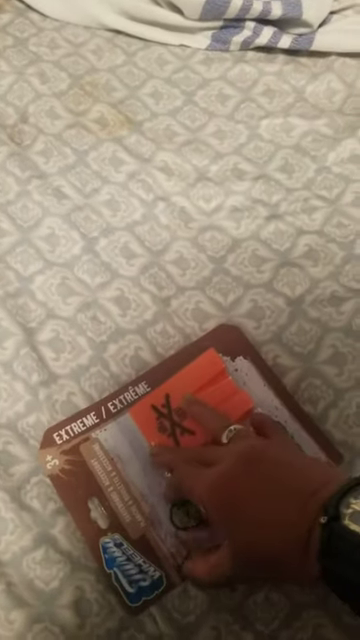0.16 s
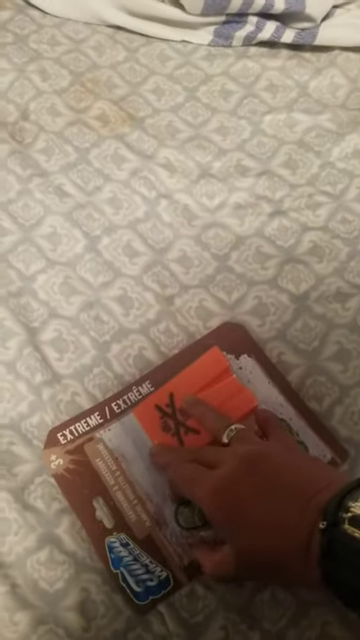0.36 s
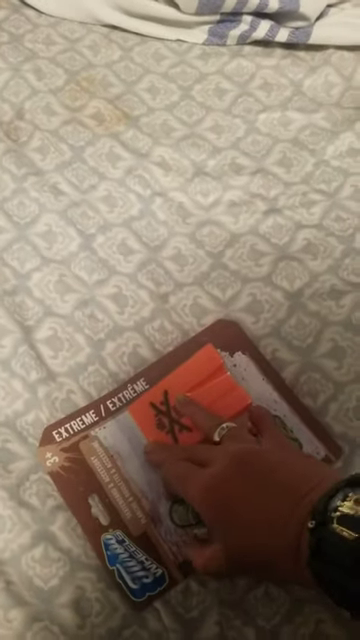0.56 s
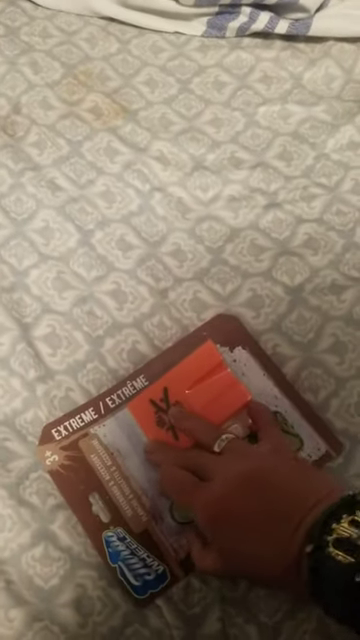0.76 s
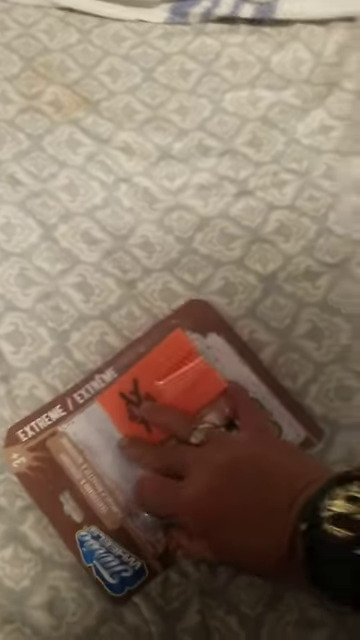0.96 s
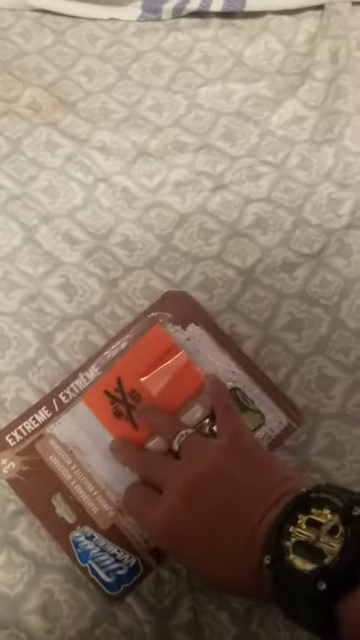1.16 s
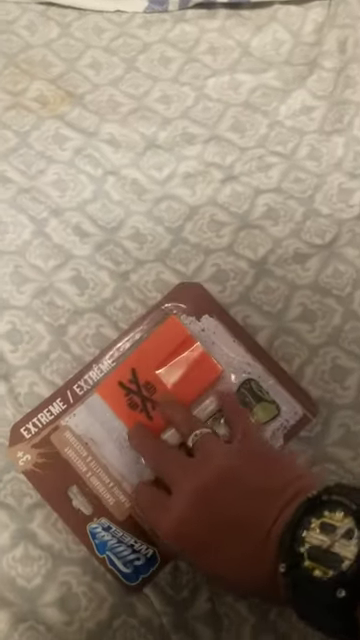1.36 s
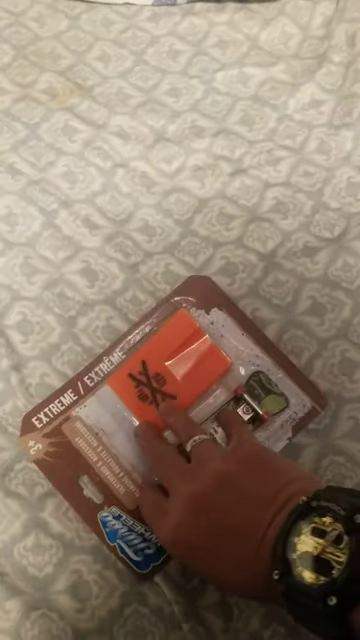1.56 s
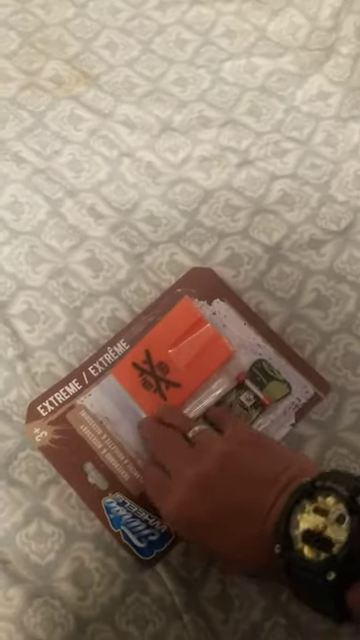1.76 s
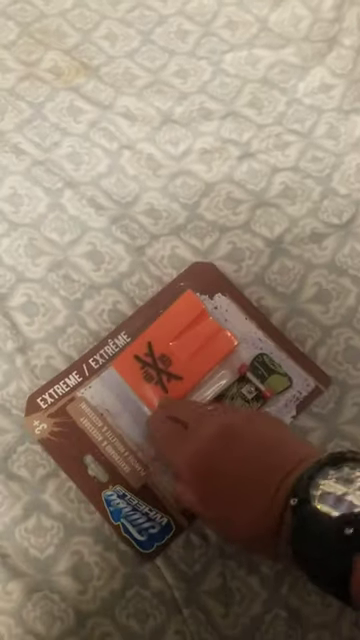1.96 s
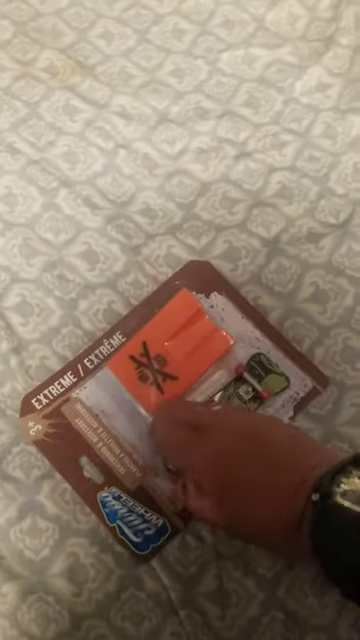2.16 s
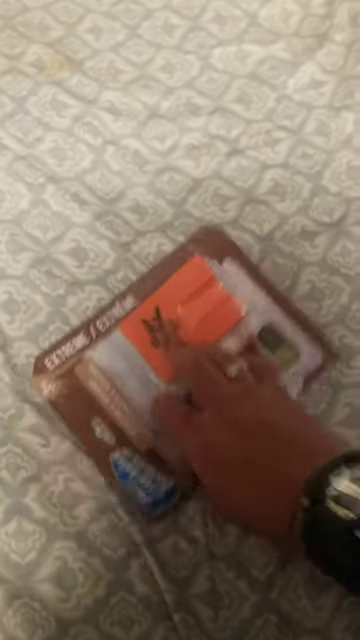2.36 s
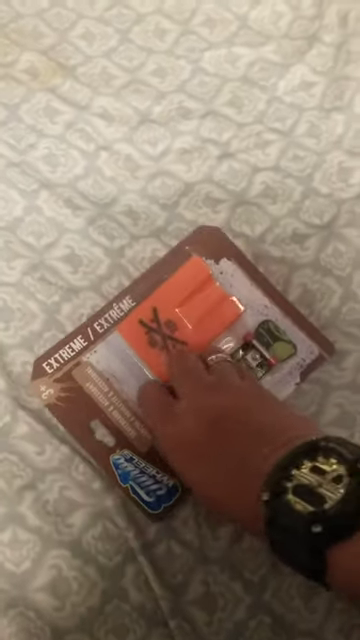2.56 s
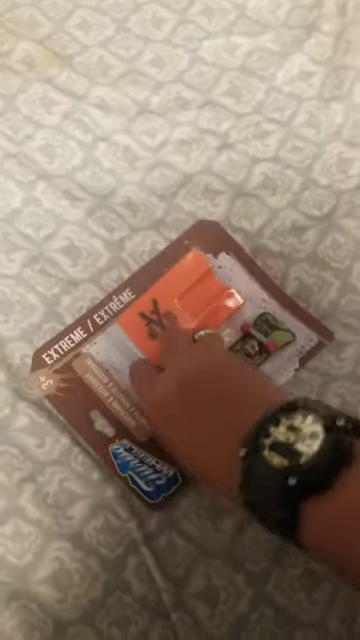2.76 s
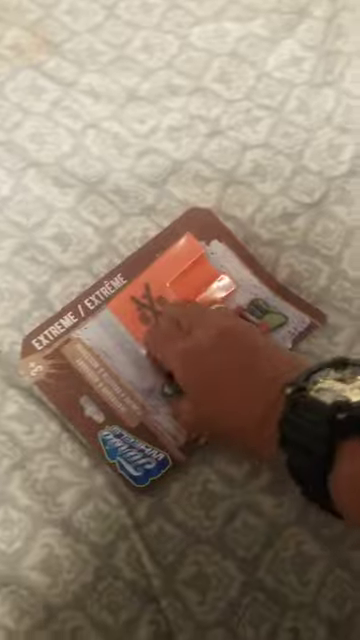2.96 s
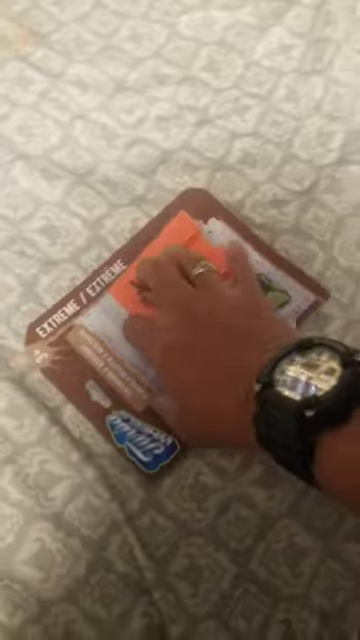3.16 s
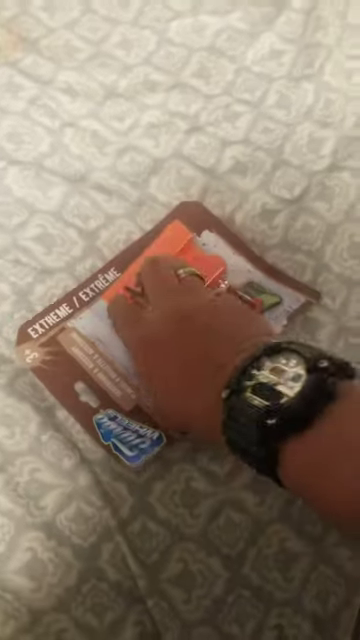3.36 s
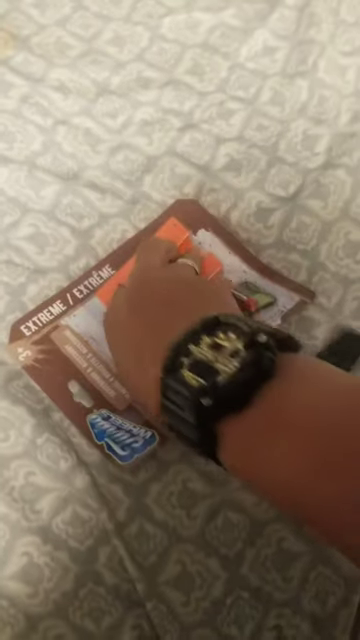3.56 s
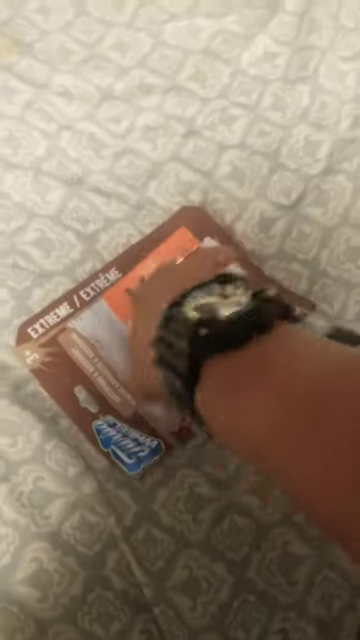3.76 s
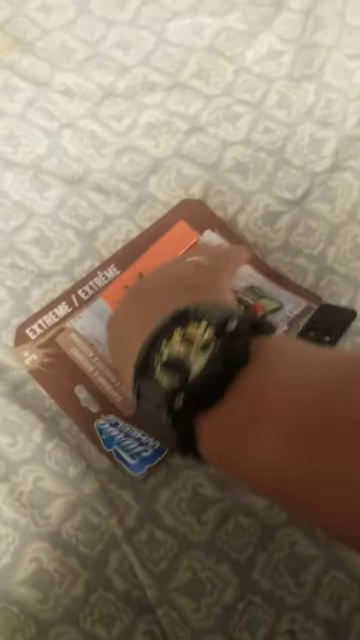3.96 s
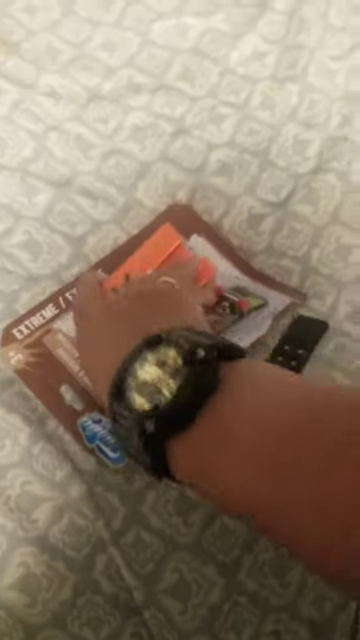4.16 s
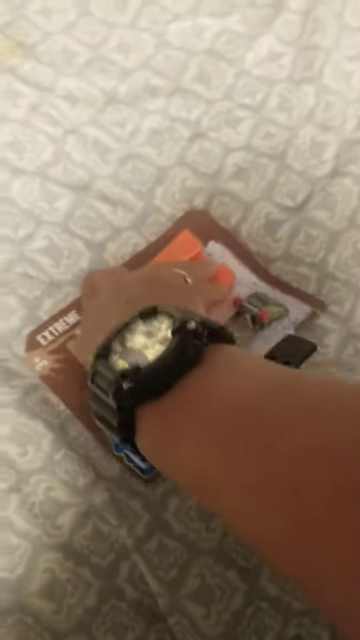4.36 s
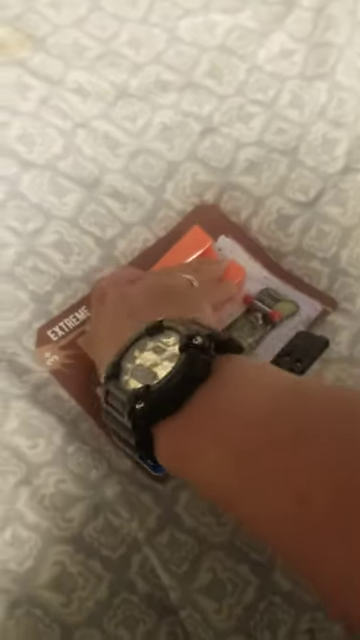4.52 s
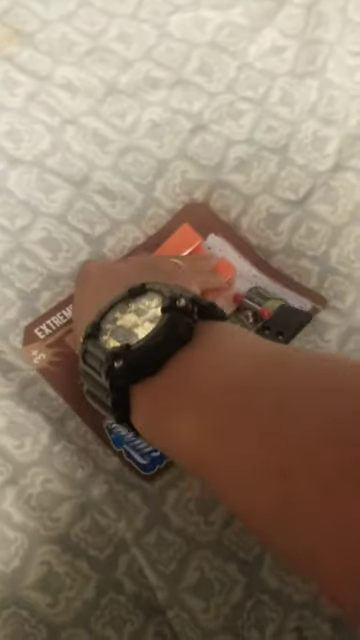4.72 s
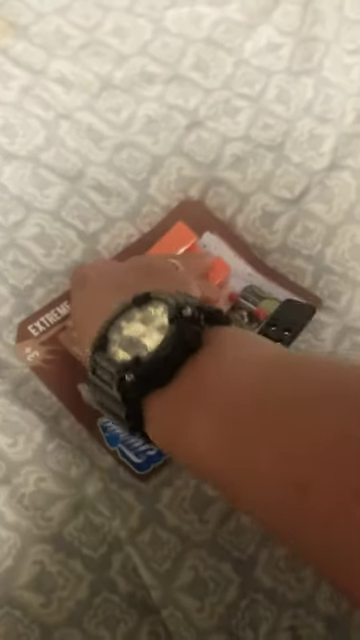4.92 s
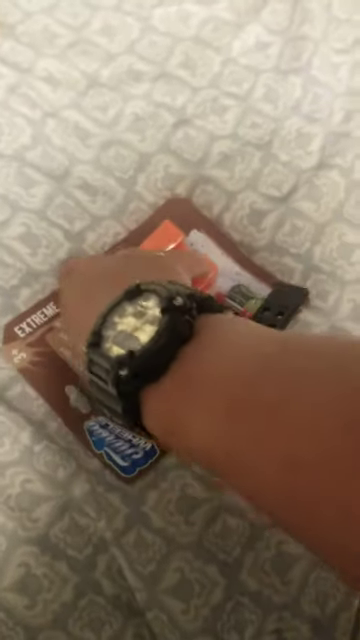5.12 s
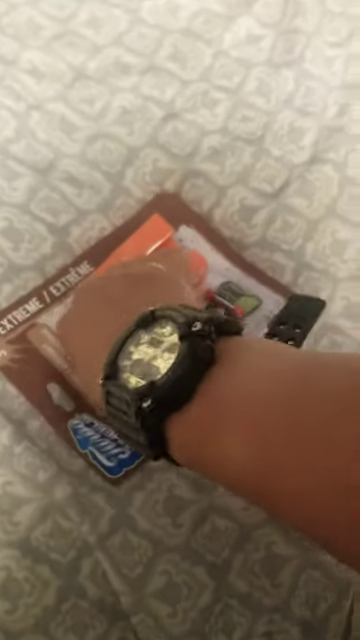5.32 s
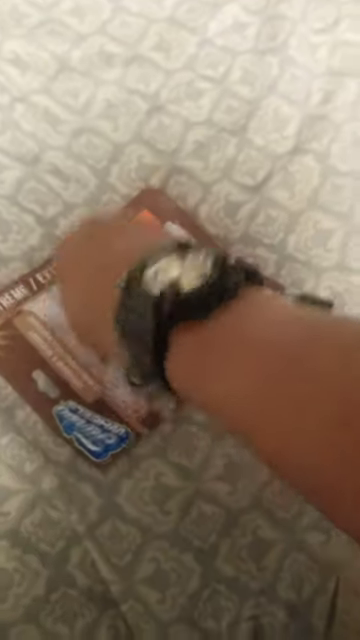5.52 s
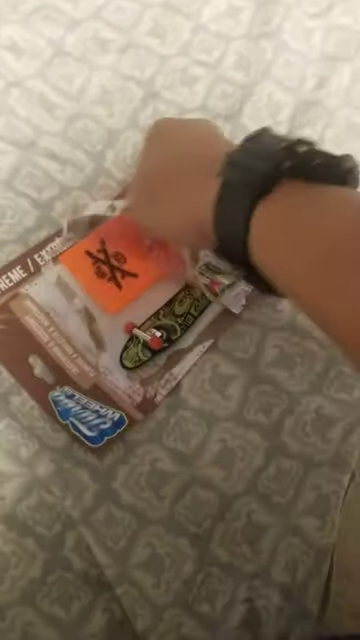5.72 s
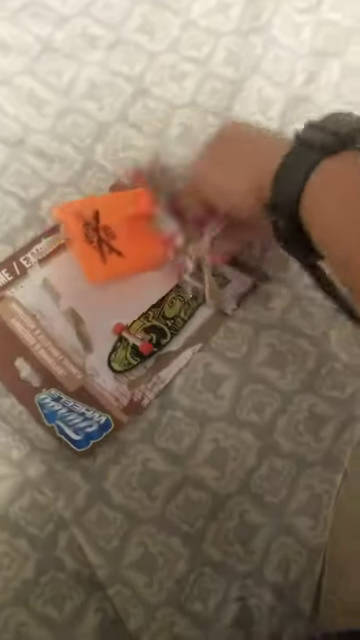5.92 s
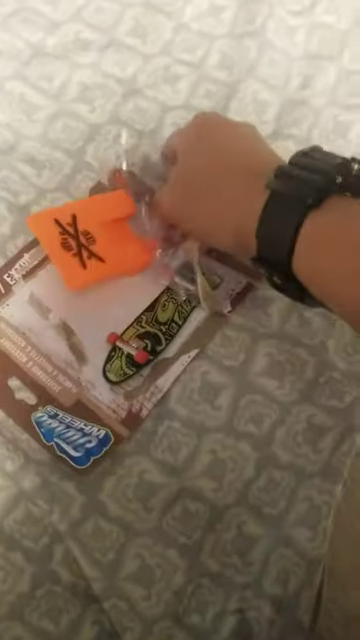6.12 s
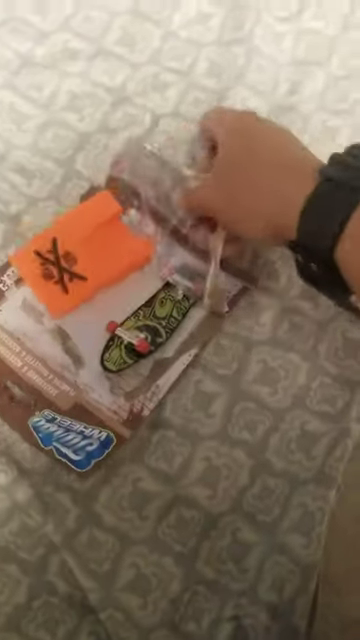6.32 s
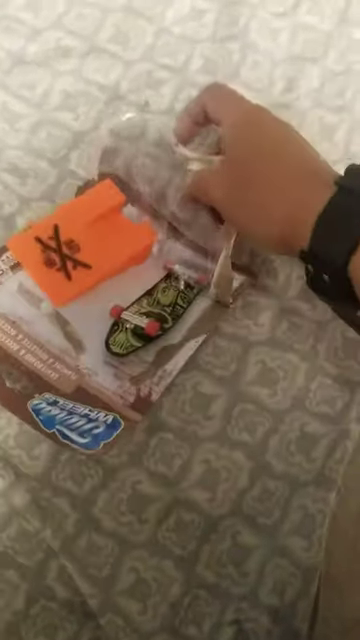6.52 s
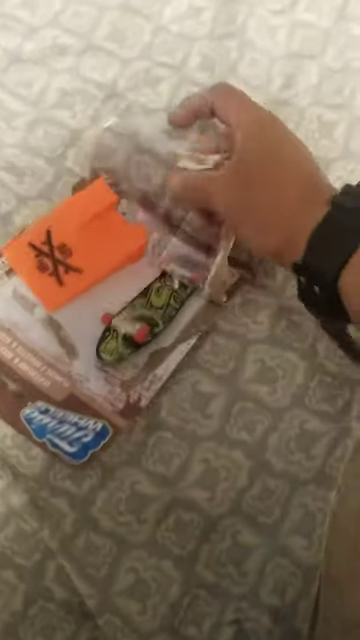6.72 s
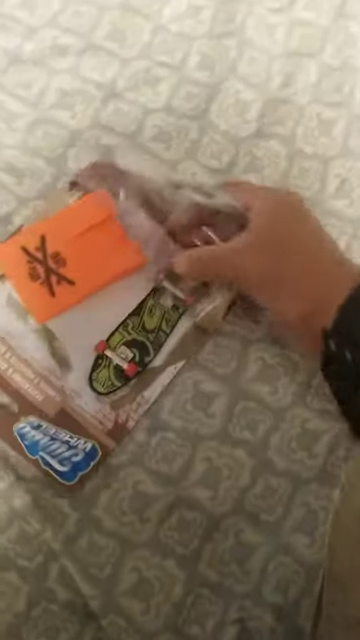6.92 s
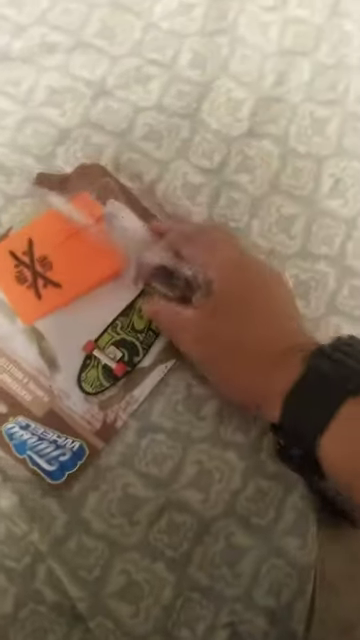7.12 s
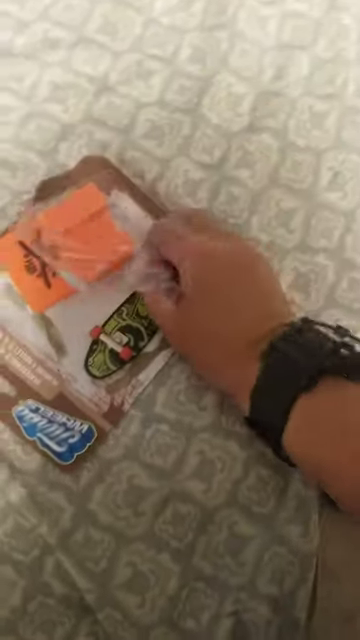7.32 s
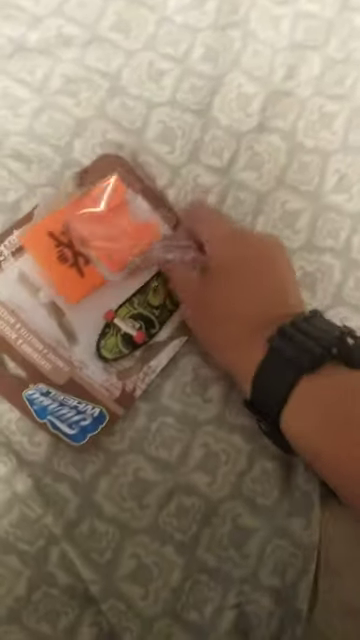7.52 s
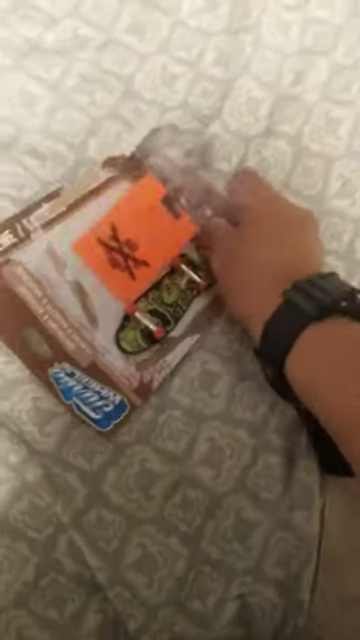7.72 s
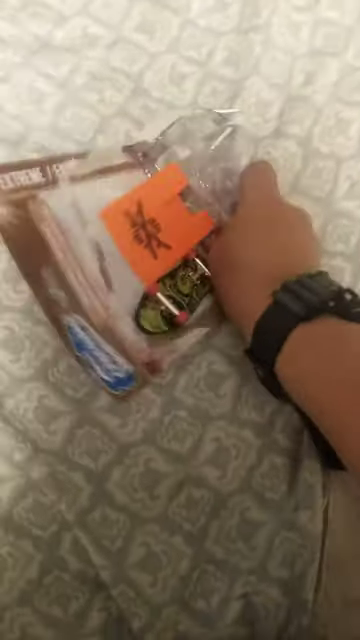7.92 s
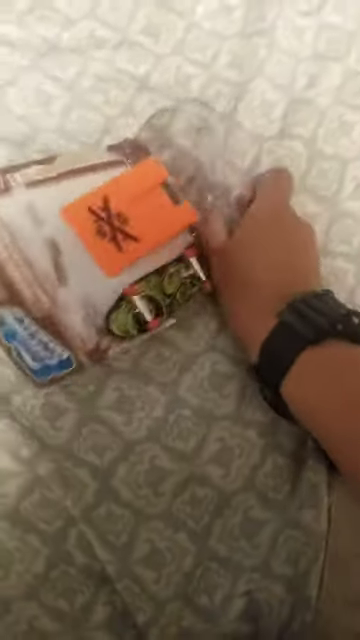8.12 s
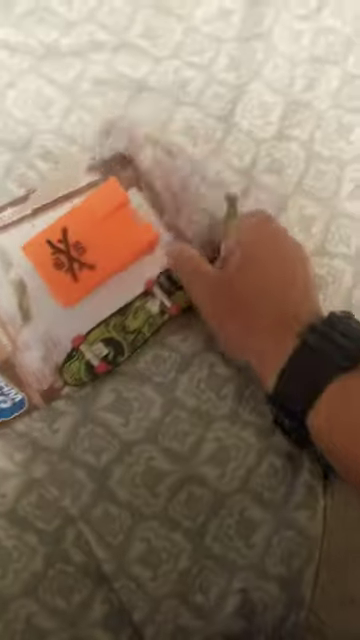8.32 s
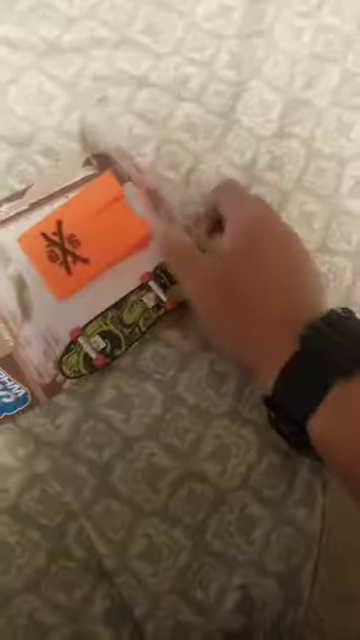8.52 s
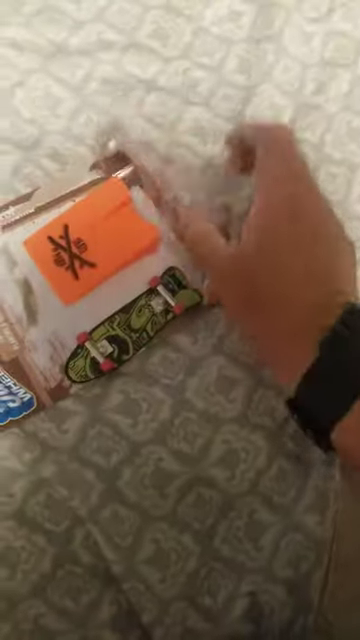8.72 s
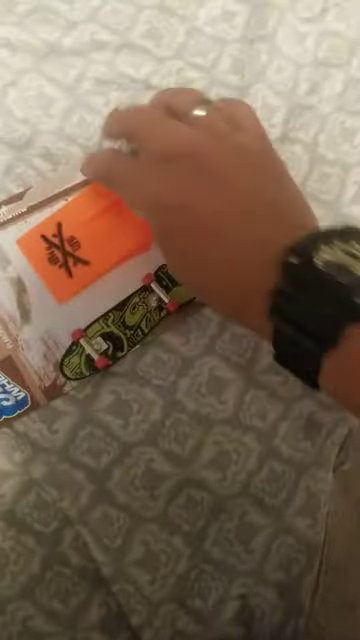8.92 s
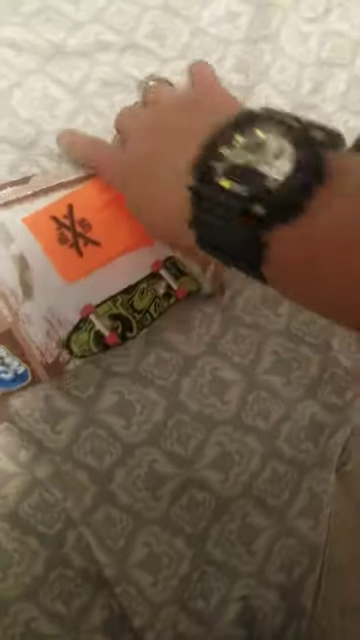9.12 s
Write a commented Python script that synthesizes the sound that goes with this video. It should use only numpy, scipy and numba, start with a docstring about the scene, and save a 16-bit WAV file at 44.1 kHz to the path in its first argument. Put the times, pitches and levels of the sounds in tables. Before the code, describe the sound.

A sharp plastic snap opens, followed by scattered clicks and brief creaks as a hand presses a blister pack. The snapping grows more frequent, then turns into dense crackling with scratchy cardboard tearing as the plastic comes off its card. Crinkling continues, pauses briefly and returns. The pack softly thumps the mattress underneath. It is heard close up on a hand-held phone in a small, soft room.

```python
"""A sharp plastic snap, then crackling: one hand crushes a blister pack and tears it off its card.
Each small face of the plastic (a facet) buckles and rings for a few milliseconds. Tiny crackles,
a creaking seal, sliding fingers and tearing paper fill the gaps, and the card thumps the mattress
under it. A small, soft room answers with one echo and a short tail, heard by a hand-held phone."""
import sys
import numpy as np
from scipy import signal
from scipy.fft import rfft, irfft
from scipy.io import wavfile
from scipy.ndimage import uniform_filter1d
from numba import njit

SR = 44100
rng = np.random.default_rng(int(sys.argv[2]) if len(sys.argv) > 2 else 0)


def wrap_up_sound(samples):
    """Save the sound to the file named by the first command line argument, as 16-bit audio."""
    columns = np.atleast_2d(samples).T
    # keep every value between -1 and 1, then stretch to whole-number steps
    tamed = np.clip(columns, -1, 1)
    steps = np.round(tamed * 32767).astype(np.int16)
    wavfile.write(sys.argv[1], SR, steps)


N = 404838  # samples, about 9.2 seconds


def undb(db):
    """Turn decibels into a number to multiply by."""
    return 10 ** (np.asarray(db) / 20)


def value_at(table, hz):
    """Read between the rows of a (Hz, value) table, on a scale of octaves."""
    row_hz, values = np.transpose(table)
    return np.interp(np.log(np.maximum(hz, 1)), np.log(row_hz), values)


def noise(spectrum, alike_hz):
    """Stereo noise of strength 1 (rms); left and right are alike below alike_hz."""
    hz = np.fft.rfftfreq(N, 1 / SR)
    mid, side = rfft(rng.standard_normal((2, N))) * undb(value_at(spectrum, hz))
    side = side * hz / np.hypot(hz, alike_hz)
    x = irfft(np.array([mid + side, mid - side]), N)
    return x / np.sqrt(np.mean(x ** 2))


def wander(per_s):
    """Glide to a new random value per_s times a second, mostly between -1 and 1."""
    step = int(SR / per_s)
    return uniform_filter1d(np.repeat(rng.standard_normal(N // step + 1), step), step)[:N]


@njit
def add_rings(out, start, hz, fade_s, rise_s, gain):
    """Add tones that rise quickly and die away. A fade time is the time to fall 60 dB."""
    for k in range(len(start)):
        tone_step = np.exp(2j * np.pi * hz[k] / SR - np.log(1000) / (fade_s[k] * SR))
        rise_step = np.exp(-1 / (rise_s[k] * SR))
        tone, held_back = 1 + 0j, 1.
        for i in range(start[k], min(start[k] + int(fade_s[k] * SR), out.shape[1])):
            tone, held_back = tone * tone_step, held_back * rise_step
            out[0, i] += (gain[0, k] * tone).imag * (1 - held_back) ** 2
            out[1, i] += (gain[1, k] * tone).imag * (1 - held_back) ** 2


def stereo(hz, left_db, level_luck, phase_luck, lag_s=.00009, bass_left_db=8.0):
    """Level and phase at the two microphones: bass leans left, treble differs at random."""
    apart = hz / np.hypot(hz, 3500)
    db = bass_left_db / (1 + (hz / 900) ** 4) + (left_db + 3.5 * level_luck) * apart
    turn = 2 * np.pi * hz * lag_s + 2.0 * apart ** 2 * phase_luck
    return np.array([undb(db / 2) * np.exp(.5j * turn), undb(-db / 2) * np.exp(-.5j * turn)])


# The tone of the quiet room. Each row: frequency in Hz, relative level in dB.
AIR_SPECTRUM = [(18, -20.5), (30, -14), (93, -2), (1340, -24.5), (2050, -21), (5300, -14.5), (8530, -31.5),
                (13400, -17.5), (16500, -31)]
def quiet_air(level_db=-67.5):
    """A faint, steady hush behind everything."""
    return noise(AIR_SPECTRUM, alike_hz=800.) * undb(level_db + np.array([[1.5], [-1.5]]))


# The first echo. Each row: delay in seconds, left level in dB, right level in dB.
FIRST_ECHO = [(.0074, -16, -41.5)]
# How long the room rings. Each row: frequency in Hz, fade time in seconds.
ROOM_FADE = [(100, 0.17), (600, 0.14), (3000, 0.22), (12000, 0.2)]
# How strongly it rings. Each row: frequency in Hz, level in dB next to the direct sound.
ROOM_LEVEL = [(100, -8.5), (600, -7), (3000, -10), (12000, -11)]
def room(direct, wall_delay_s=.0072):
    """The walls send back one clear echo and a short, blurred tail."""
    t = np.arange(SR // 2) / SR
    tail = np.zeros((2, len(t)))
    for hz in 63 * 2. ** np.arange(9):
        edges_hz = [hz / np.sqrt(2), min(hz * np.sqrt(2), .45 * SR)]
        octave = signal.butter(2, edges_hz, "band", fs=SR, output="sos")
        mid, side = rng.standard_normal((2, len(t)))
        wash = mid + min(hz / 2500, 1) * side * np.array([[1], [-1]])
        fade = undb(-60 * t / value_at(ROOM_FADE, hz))
        fade /= np.sqrt(2 * np.sum(fade ** 2))
        tail += signal.sosfilt(octave, wash * fade) * undb(value_at(ROOM_LEVEL, hz))
    wait = int(wall_delay_s * SR)
    response = np.pad(tail, ((0, 0), (wait, 0)))
    response[:, :wait] += tail[:, :wait] * undb(1.0)  # bedding and hand scatter sound before the walls
    for delay_s, left_db, right_db in FIRST_ECHO:
        response[:, int(delay_s * SR)] += undb([left_db, right_db])
    return signal.fftconvolve(direct, response, axes=1)[:, :N]


# The mattress's low tones. Each row: pitch in Hz, relative level in dB, fade time in seconds.
MATTRESS_TONES = [(81, 1, 0.086), (115.7, -1, 0.046), (306, 8, 0.02)]
# Pushes into the mattress. Each row: start in seconds, level in dB, extra dB for the highest tone.
PUSHES = [(0.352, -33, -15), (0.629, -27, -4), (1.391, -38.5, -9), (1.867, -44, -18), (1.916, -43, 4),
          (2.171, -39.5, 3), (2.533, -16, -1.5), (2.689, -35, 4), (3.33, -30, -3), (3.411, -42, -30),
          (3.736, -24, -42), (4.115, -31, -4), (4.159, -41.5, -7), (4.366, -31.5, 7), (4.781, -38, 1.5),
          (5.133, -31.5, -29), (5.553, -39.5, -13), (5.634, -28, -22), (5.696, -37, 7), (5.738, -32, -12),
          (5.897, -31, -5), (7.587, -37, -3), (8.195, -34.5, 4), (8.252, -42, 11), (9.095, -40.5, -17)]
def mattress(rumble_db):
    """Card and hand push the mattress into soft thumps; its padding rumbles under the hand."""
    start_s, db, extra_db = np.transpose(PUSHES)
    hz, tone_db, fade_s = np.transpose(MATTRESS_TONES)
    luck = rng.standard_normal((len(start_s), len(hz), 3))
    hz = hz * (1 + 0.036 * luck[..., 0])
    level = undb(db[:, None] + tone_db + np.outer(extra_db, [0, 0, 1]))
    gain = level * stereo(hz, 0, luck[..., 1], luck[..., 2])
    start = np.repeat(start_s * SR, 3).astype(int)
    rise_s = np.full(hz.size, .0015)
    thumps = np.zeros((2, N))
    add_rings(thumps, start, hz.ravel(), np.tile(fade_s, len(start_s)), rise_s, gain.reshape(2, -1))
    rumble = noise([(30, -14.0), (80, -2.0), (125, -11), (300, -17), (1500, -46.5)], alike_hz=600.)
    return thumps + rumble * undb(rumble_db + 1.3 * wander(38) + np.array([[3.5], [-3.5]]))


# The tone of tearing and rubbing. Each row: frequency in Hz, relative level in dB.
HISS_SPECTRUM = [(150, -26), (250, -8), (495, -26.5), (823, 1), (1370, -7), (2010, -8), (2670, -6.5),
                 (5470, -6), (8930, -10.5), (15100, -8.5), (16500, -31.5)]
def rustle(effort_db, bright_db):
    """Paper fibres tear and skin rubs on plastic: a flickering hiss."""
    hiss = noise(HISS_SPECTRUM, alike_hz=1500.)
    treble = signal.sosfilt(signal.butter(2, 5000, "high", fs=SR, output="sos"), hiss)
    hiss = hiss + treble * (undb(bright_db) - 1)
    flicker_db = np.minimum(14 * wander(120), 5)
    return hiss * undb(effort_db - 5.0 + flicker_db + np.array([[1.5], [-1.5]]))


# Finger strokes. Each row: start and end in seconds, final level in dB, growth on the way in dB.
STROKES = [(.55, .63, -67, 12), (2.11, 2.178, -49, 22), (4.004, 4.033, -59, -1), (4.094, 4.143, -57, -1),
           (4.186, 4.358, -41, 16), (5.8, 5.978, -50, 1), (6.02, 6.084, -53, 1), (6.33, 6.38, -52, 3),
           (6.913, 6.98, -53, 1), (7.813, 7.902, -51.5, -8), (8.086, 8.26, -49.5, -5),
           (8.412, 8.49, -53.5, 1), (8.845, 8.93, -50, 8)]
def finger_slides(stop_s=0.0069):
    """A finger on plastic hisses, swelling or sinking, and fades quickly when it halts."""
    t = np.arange(N) / SR
    level = np.zeros(N)
    for start_s, end_s, db, growth_db in STROKES:
        still_to_go = ((end_s - t) / (end_s - start_s)).clip(0, 1)
        halt = np.exp(-(t - end_s).clip(0) / stop_s)
        level += undb(db - growth_db * still_to_go) * (t > start_s) * halt
    return noise(HISS_SPECTRUM, alike_hz=1500.) * level * undb(4.9 * wander(55))


# A facet's four pitch bands: card body, main ring, thin ring, crisp edge.
# Each row: lowest and highest pitch in Hz, typical fade time in seconds, boost in dB.
PLASTIC_BANDS = [(408, 1240, 0.0096, 4), (1028, 3807, 0.0058, 11), (3255, 8100, 0.0028, 17),
                 (7310, 17520, 0.0055, 15.5)]
def facet_clicks(start_s, main_hz, band_db, left_db, tones):
    """Each click rings a fresh set of very short tones, spread across each band."""
    dice = rng.random((len(start_s), 4, tones, 4))
    luck = rng.standard_normal((len(start_s), 4, tones, 3))
    low_hz, high_hz, typical_s, boost_db = (column[:, None] for column in np.transpose(PLASTIC_BANDS))
    hz = low_hz * (high_hz / low_hz) ** ((np.arange(tones) + dice[..., 0]) / tones)
    db = band_db[:, :, None] + boost_db - 10 * np.log10(tones) + 2.0 * luck[..., 0]
    db[:, 1] -= 11 * np.log2(hz[:, 1] / main_hz[:, None]) ** 2  # the main ring favours main_hz
    # the facet lets go in one to three slips within about a millisecond
    slip_s = start_s[:, None, None] + .0006 * dice[:, :1, :1, 3] * np.floor(3 * dice[..., 1] ** 2)
    phase = 2 * np.pi * (dice[:, :1, :1, 2] + .45 * dice[..., 2])  # nearly in step: a sharp spike
    gain = undb(db) * np.exp(1j * phase) * stereo(hz, left_db, luck[..., 1], luck[..., 2])
    fade_s = typical_s * (.6 + .8 * dice[..., 3])
    clicks = np.zeros((2, N))
    for k in range(4):
        band = np.zeros((2, N))
        start = (slip_s[:, k] * SR).astype(int).ravel()
        fades = fade_s[:, k].ravel()
        add_rings(band, start, hz[:, k].ravel(), fades, 0.022 * fades, gain[:, :, k].reshape(2, -1))
        # a small facet gives off almost nothing below its own tones
        bass_cut = signal.butter(2, 0.6 * low_hz[k, 0], "high", fs=SR, output="sos")
        clicks += signal.sosfilt(bass_cut, band)
    return clicks


def crackle(effort_db, bright_db, chances_per_s=450, busy_db=-44.5, sparse_share=0.093):
    """Tiny facets buckle at random; harder handling makes more of them, and louder."""
    when, size, chance, pitch = rng.random((int(chances_per_s * N / SR), 4)).T
    start = (when * N).astype(int)
    db = effort_db[start] + np.minimum(-2.5 * np.log(1 - size), 14.)
    # above busy_db every chance sounds; 20 dB lower, only sparse_share of them do
    db[chance > sparse_share ** ((busy_db - effort_db[start]) / 20)] = -np.inf
    tilt_db = np.outer(bright_db[start], [-0.51, -0.42, 0.71, 0.74])
    colour_db = np.array([-8.5, -6.5, -5.5, -9.5]) + tilt_db + 5.66 * rng.standard_normal((len(db), 4))
    return facet_clicks(start / SR, 900 * 4.2 ** pitch, db[:, None] + colour_db, left_db=2.5, tones=4)


# Creaks of the seal. Each row: start and end in seconds, slips per second at first and at last,
# level in dB, main ring in Hz, extra dB for the thin ring.
SEAL_RUNS = [(1.905, 1.945, 150, 140, -37, 1900, -12), (1.958, 2.058, 90, 95, -36, 1800, -12),
             (2.939, 3.012, 115, 88, -41, 2200, -4), (6.175, 6.2, 200, 180, -45, 2300, -8)]
def seal_creaks(unevenness=0.17):
    """The seal sticks and slips, making quick runs of similar ticks."""
    ticks = []
    for start_s, end_s, first_rate, last_rate, db, hz, thin_db in SEAL_RUNS:
        count = int((end_s - start_s) * (first_rate + last_rate) / 2) + 1
        luck = rng.standard_normal((count, 2))
        gaps_s = (1 + unevenness * luck[:, 0]) / np.linspace(first_rate, last_rate, count)
        times_s = start_s + np.cumsum(gaps_s) - gaps_s[0]
        band_db = db + 0.28 * luck[:, 1:] + np.array([-8, 0, thin_db, -24])
        ticks.append(np.column_stack([times_s, np.full(count, hz), band_db]))
    ticks = np.concatenate(ticks)
    return facet_clicks(ticks[:, 0], ticks[:, 1], ticks[:, 2:], left_db=1.5, tones=6)


# Single snaps of the blister. Each row: start in seconds, level in dB, main ring in Hz,
# extra dB for the card body, extra dB for the crisp edge.
BUCKLES = [(.0055, -8.5, 1160, -18.5, -19), (0.114, -39, 2030, -24, -38), (.156, -33.5, 3320, -29, -6),
           (0.1747, -26.5, 2230, -10.5, -38), (.222, -43.5, 2500, 3, -25), (0.3407, -47, 3140, -1, 11),
           (0.458, -43.5, 2360, -0.5, -22), (.503, -47, 3000, -16, -22), (0.588, -38, 1200, -3, -35),
           (0.6282, -33, 900, 8.5, 2), (0.835, -42, 1570, -11.5, -26), (.8467, -29.5, 2220, -18, -47),
           (0.962, -16, 3510, -7, -5.5), (1.196, -51, 2380, -12, -9), (1.236, -49, 2200, -4.5, -11),
           (1.248, -48, 1200, -6, -16), (1.3891, -34, 2700, -16.5, -18), (1.457, -41, 3450, -9, -27),
           (1.521, -54.5, 3600, -6, 4), (1.675, -35.5, 2000, -3, -22), (1.7106, -18, 2160, -12.5, -24.5),
           (1.8307, -31, 2140, -6, -3), (1.845, -28, 3000, -16, -10), (1.8607, -33.5, 1950, -3, -10),
           (2.0846, -32, 1850, -22, -44), (2.139, -36.5, 3760, -1, -13), (2.198, -29.5, 2040, -9, -24),
           (2.2166, -21.5, 2840, -32, -9.5), (2.2878, -19.5, 1790, -20.5, -15.5),
           (2.4436, -39, 1530, -31, -32), (2.49, -40, 1240, -3, -37), (2.5348, -11.5, 1840, -12, -13),
           (2.5384, -17, 1770, 2, -11.5), (2.6696, -18, 1700, -13, -14), (2.6853, -23.5, 1900, -5.5, -13.5),
           (2.7284, -29.5, 910, 1, -12.5), (2.8549, -29.5, 2200, -13, -51), (3.0224, -26.5, 2540, -12, -44),
           (3.0626, -20, 2130, -16, -18), (3.1549, -26.5, 1600, -26, -36), (3.1583, -20.5, 1850, -6.5, -26),
           (3.2119, -29.5, 2170, -15, -23), (3.2275, -29.5, 2020, -10, 4), (3.3168, -11.5, 2480, -61, -17),
           (3.3336, -16, 2220, -12.5, -11), (3.379, -30.5, 1800, -3, -14), (3.3963, -30.5, 2270, -14, -10),
           (3.4104, -17, 2350, -30, -11.5), (3.5057, -16.5, 1340, -14, -8), (3.699, -36, 1070, -2, -25),
           (3.71, -27.5, 1900, -18, -27), (3.7229, -24, 1920, -8, -13), (3.7387, -19.5, 3200, -14, -17),
           (3.7733, -26, 960, -6, -25), (3.8925, -32, 1270, -11, -13.5), (4.0062, -24, 1970, -11, -43),
           (4.021, -33.5, 1790, 2, -32), (4.0897, -27.5, 1930, -36, -43), (4.1088, -24, 1690, -3.5, -28),
           (4.3653, -21, 1020, 4, -11), (4.511, -36, 3200, -10, -23), (4.557, -27, 2150, -11.5, -16),
           (4.6159, -40.5, 3190, -25, 2), (4.6256, -13, 3350, -21, -23), (4.7286, -14.5, 2560, -12, -4.5),
           (4.739, -19, 2070, -10.5, -44), (4.7767, -29, 2100, -2.5, -22), (4.8041, -22, 1350, -3.5, -20.5),
           (4.917, -39, 2480, -1.5, -26), (5.0387, -27.5, 1610, -13, -29), (5.101, -40.5, 3500, 2.5, -2),
           (5.1342, -23.5, 3330, -1.5, -6.5), (5.2874, -39.5, 1130, 3, -24),
           (5.3515, -26.5, 2300, -5, -15.5), (5.4596, -27, 870, -18, -18), (5.481, -23.5, 3280, -2, -4),
           (5.5521, -29, 3480, -23, 1), (5.5588, -19.5, 2300, -3.5, -4), (5.5628, -22, 2060, -30, -13),
           (5.571, -28, 2470, -14, 5), (5.6165, -13, 2550, -51, -13), (5.6368, -12, 1670, -15, -10.5),
           (5.661, -38.5, 2070, 4.5, 11), (5.6965, -22, 3520, -30, -10.5), (5.7442, -23.5, 2020, -3, -8.5),
           (5.8129, -23.5, 1310, -4, -10), (5.8286, -18.5, 1550, -5.5, -8), (5.8374, -22.5, 900, -9, -10),
           (5.847, -29, 2080, -27, 0), (5.8768, -19, 2150, -31, -18), (5.886, -27, 2170, -24, 3),
           (5.8906, -14, 2070, -8, -1.5), (5.9169, -15, 1710, -23.5, -4), (5.9212, -24.5, 2220, 17, 3),
           (5.944, -21, 2290, -45, -12), (6.022, -28.5, 2210, -9.5, -10), (6.0351, -23.5, 2440, -17, -14),
           (6.052, -27.5, 2200, -7.5, -30), (6.1702, -34.5, 2330, -21, -23),
           (6.3176, -19.5, 2130, -11, -15.5), (6.3379, -27.5, 1740, -0.5, -13),
           (6.365, -31.5, 1500, 0, -25), (6.4764, -36.5, 2160, 1, -33), (6.5765, -30.5, 1870, -17, -11),
           (6.705, -37, 1100, -5, -30), (6.7689, -25, 2050, -12, -8.5), (6.7754, -33.5, 2200, 4.5, -29),
           (6.788, -33.5, 1520, 8, -24), (6.821, -39, 1500, 2, -33), (6.9204, -33.5, 1850, 4, -7),
           (6.9498, -22.5, 1820, 0, -24), (6.9536, -29.5, 1780, -10, -12), (6.9933, -30, 2970, -9.5, -16),
           (7.044, -36.5, 3220, -7, -18), (7.158, -17, 2850, -19.5, -9.5), (7.1826, -25, 3290, -39, -14),
           (7.1994, -27.5, 2100, -15.5, -7), (7.261, -10, 2590, -22.5, -9), (7.3212, -24, 2200, -11, -9.5),
           (7.398, -31.5, 2200, 2, -38), (7.419, -26.5, 1880, -12, -30), (7.439, -37.5, 1860, -16.5, 3.5),
           (7.463, -35.5, 2310, -29, -23), (7.4757, -17, 2200, -23, -16.5), (7.5173, -17, 3370, -10.5, -5),
           (7.544, -23, 1840, -6, -11), (7.562, -22, 2370, -8, -13), (7.5739, -16, 1910, -27, -5.5),
           (7.5838, -23, 1180, 1, -14), (7.591, -14.5, 1270, -10, -6.5), (7.628, -23, 965, -8.5, -19),
           (7.65, -21.5, 1660, -15, -2.5), (7.6721, -26.5, 1770, -17, -14), (7.6878, -23, 960, -9, -30),
           (7.7506, -8.5, 3120, -16.5, -15), (7.8652, -33, 1790, -3, -1), (7.9736, -36, 1660, -7, -26),
           (8.041, -17.5, 3250, -28, -17.5), (8.0889, -20.5, 2120, -12, -14),
           (8.1158, -20.5, 1900, -25, -18), (8.1314, -22.5, 1870, -12, -14), (8.1883, -25.5, 1800, -5, -12),
           (8.1983, -28.5, 1730, 3, -6.5), (8.2294, -29, 2120, 0, -14), (8.257, -31, 1390, 2, -14),
           (8.3167, -35, 1720, -0.5, 8.5), (8.7986, -30, 1400, -24, -29), (8.865, -48, 3500, -7, -11.5),
           (8.9201, -24, 1680, -12, -26.5), (8.9715, -32.5, 1800, -2, -21), (8.9868, -27, 2040, 0, -24),
           (9.07, -37.5, 2000, -11, -21), (9.09, -21, 1470, -12, -8.5), (9.0926, -15.5, 3640, -8.5, -17)]
def snaps():
    """Facets buckle one by one with a sharp snap; the pack lies a little to the left."""
    start_s, db, hz, body_db, crisp_db = np.transpose(BUCKLES)
    thin_db = 4 + 0.65 * crisp_db  # a crisper snap also rings thinner
    colour_db = np.transpose([body_db, np.zeros_like(db), thin_db, crisp_db])
    return facet_clicks(start_s, hz, db[:, None] + colour_db, left_db=6, tones=9)


# How the hand works. Each row: time in seconds, effort in dB (it drives crackle and rustle),
# mattress rumble in dB, brightness in dB.
HAND_MOTION = [(0.0, -57, -48.5, -11), (0.36, -65.5, -57.5, -29), (0.82, -58, -55, -25.5),
               (1.02, -65.5, -76, -4), (1.28, -74.5, -72, -7), (1.76, -56.5, -56.5, 8),
               (1.87, -54.5, -48.5, -10), (1.99, -53, -49, 11), (2.1, -60.5, -61, -6),
               (2.22, -49.5, -57.5, 1), (2.68, -63, -56, -10), (2.89, -58, -58.5, -25),
               (3.09, -63, -62, -3), (3.22, -47.5, -57.5, -13), (3.4, -55, -51, 8),
               (3.55, -57.5, -57.5, -23), (3.73, -57, -61, -3), (4.22, -51.5, -53, -13),
               (4.42, -63, -62, -20), (4.73, -55.5, -55, 2), (4.83, -59, -60.5, -28),
               (5.11, -68, -58.5, -24), (5.42, -49, -52, 0), (5.57, -43.5, -43, -6), (5.78, -45, -55, -2),
               (5.9, -42.5, -58.5, -10), (6.08, -57.5, -67, -0.5), (6.49, -61, -70.5, -7),
               (6.7, -53.5, -65, -7), (6.95, -52, -58, -21.5), (7.23, -55.5, -55.5, 12),
               (7.47, -67, -56.5, -16), (7.65, -46, -48, -18), (7.87, -50, -66.5, -4.5),
               (8.13, -51, -53, -6.5), (8.28, -50.5, -59, -12), (8.56, -58.5, -77.5, -4),
               (8.82, -78, -66, 0), (9.03, -47, -52, -8), (9.18, -48, -59, -13)]
def scene():
    """The pack and the mattress, their echo in the room, and the quiet air."""
    times_s, *columns = np.transpose(HAND_MOTION)
    effort_db, rumble_db, bright_db = (np.interp(np.arange(N) / SR, times_s, c) for c in columns)
    effort_db = effort_db + 2.5 * wander(12)  # the fingers grip and ease several times a second
    pack = snaps() + seal_creaks() + finger_slides() + crackle(effort_db, bright_db)
    direct = pack + rustle(effort_db, bright_db) + mattress(rumble_db)
    return direct + room(direct) + quiet_air()


# One peak and two dips from the microphone's duct. Each row: centre in Hz, width in Hz, change in dB.
MIC_DUCT = [(2010, 270, 6.5), (8630, 5250, -14.5), (15100, 2100, -3)]
def record(dry, lowest_hz=42., highest_hz=17100):
    """The duct colours the treble. The sound loses its deepest bass, has its loud peaks rounded,
    dulls above 16 kHz and stops near 17 kHz."""
    hz = np.fft.rfftfreq(N, 1 / SR)
    duct_db = sum(db / (1 + (2 * (hz - centre) / width) ** 2) for centre, width, db in MIC_DUCT)
    top_loss_db = 18 / (1 + np.exp((15900 - hz) / 150))
    x = irfft(rfft(dry) * undb(duct_db - top_loss_db), N)
    x = signal.sosfilt(signal.butter(2, lowest_hz, "high", fs=SR, output="sos"), x)
    rounded = np.tanh(0.79 * x) / 0.62
    return signal.sosfilt(signal.ellip(14, .2, 105, highest_hz, fs=SR, output="sos"), rounded)


dry = scene()
out = record(dry)
wrap_up_sound(out)
```